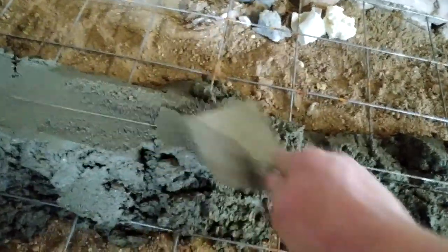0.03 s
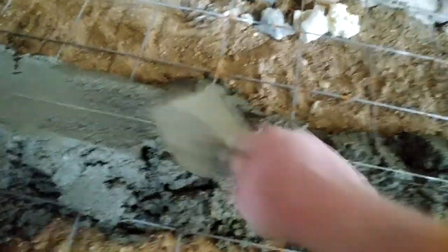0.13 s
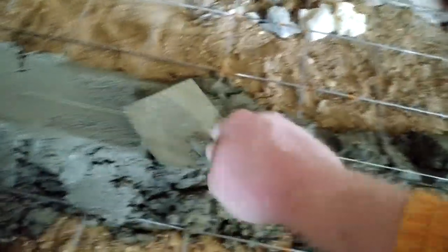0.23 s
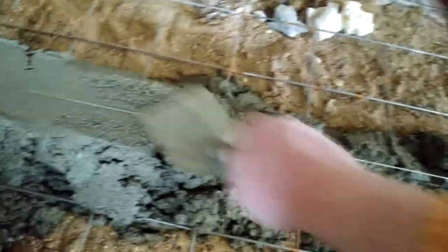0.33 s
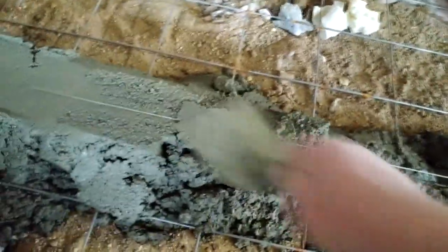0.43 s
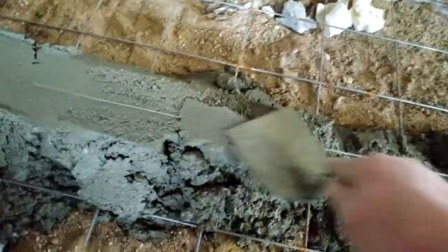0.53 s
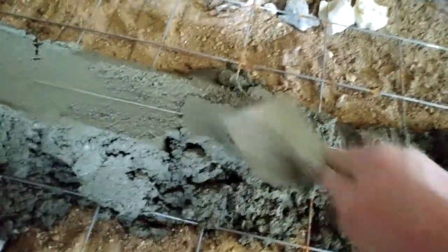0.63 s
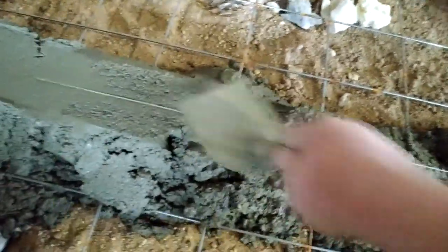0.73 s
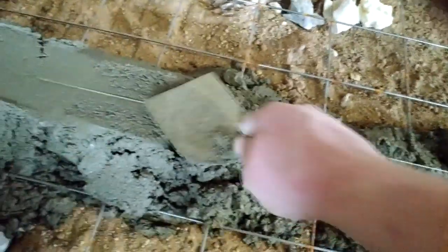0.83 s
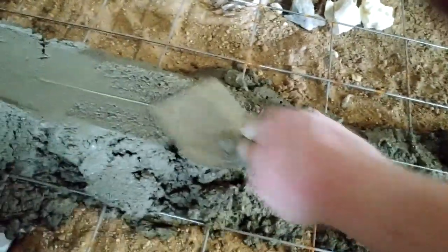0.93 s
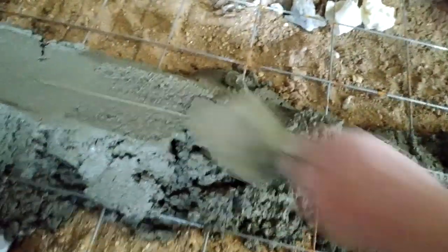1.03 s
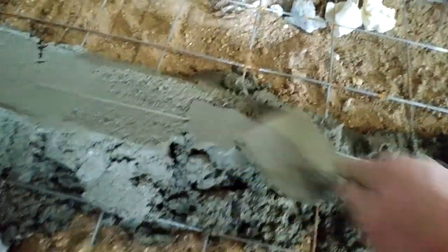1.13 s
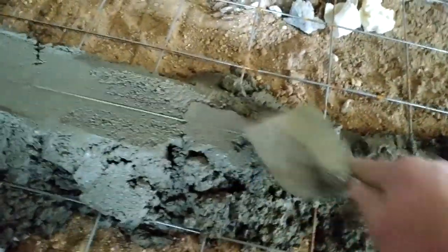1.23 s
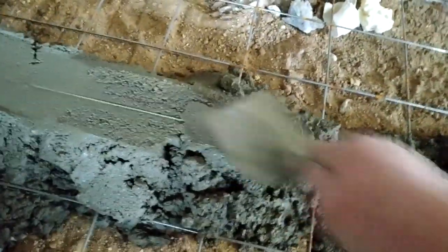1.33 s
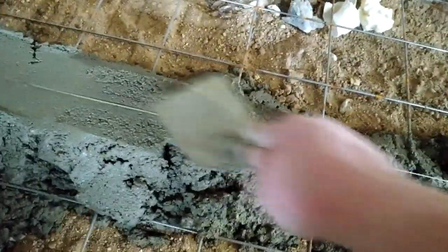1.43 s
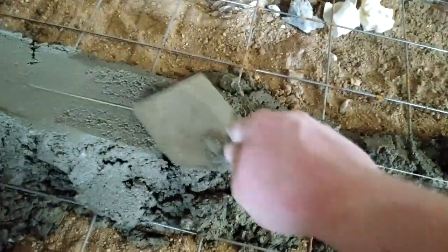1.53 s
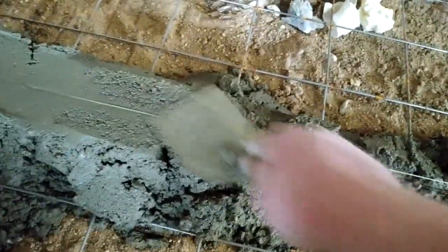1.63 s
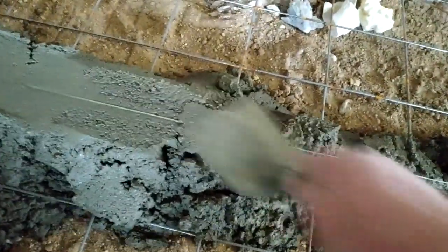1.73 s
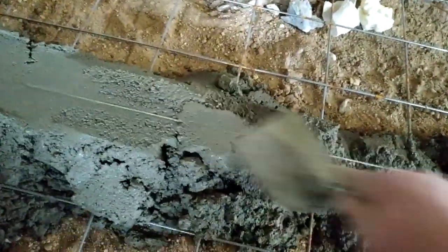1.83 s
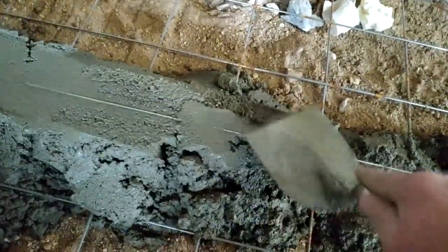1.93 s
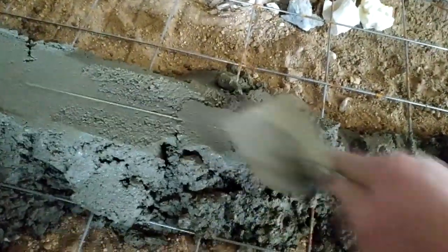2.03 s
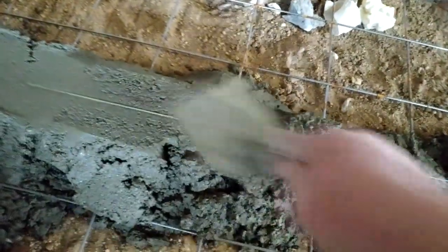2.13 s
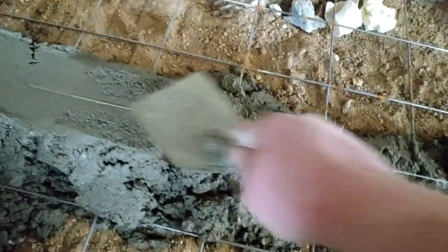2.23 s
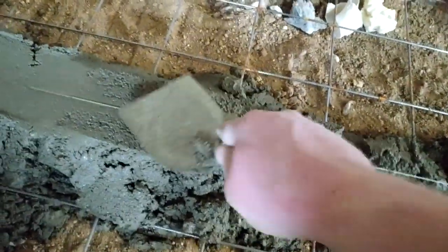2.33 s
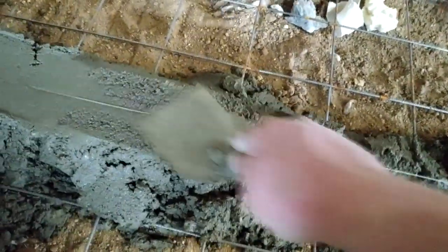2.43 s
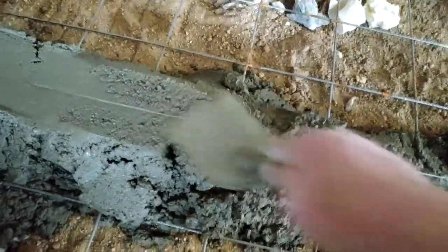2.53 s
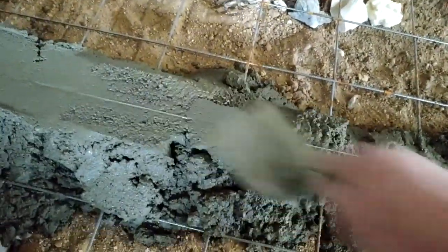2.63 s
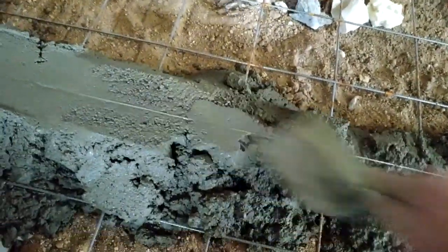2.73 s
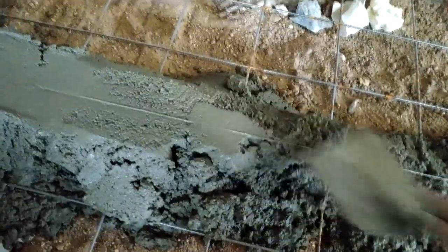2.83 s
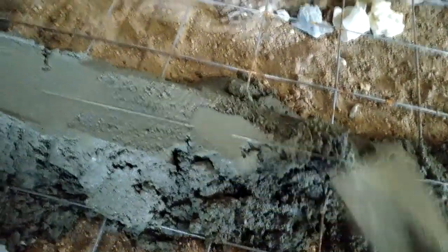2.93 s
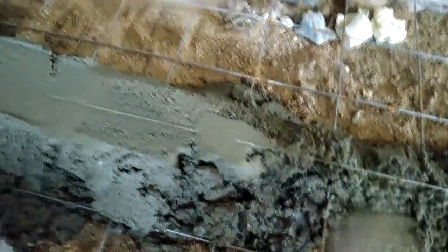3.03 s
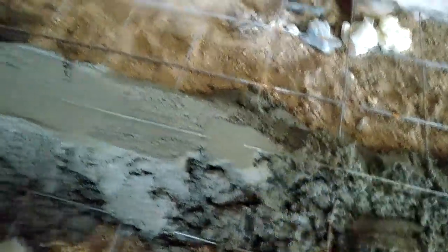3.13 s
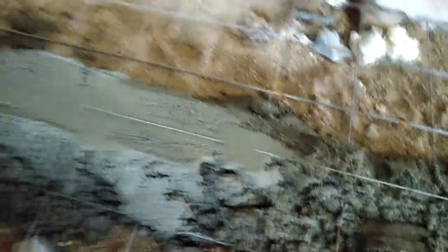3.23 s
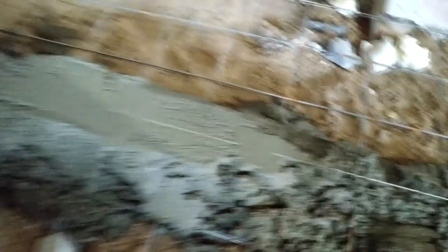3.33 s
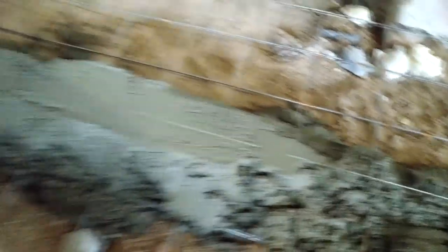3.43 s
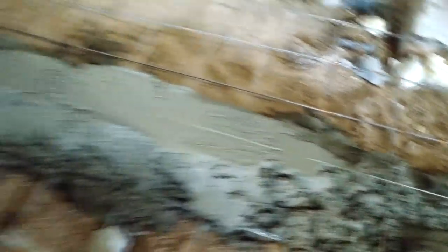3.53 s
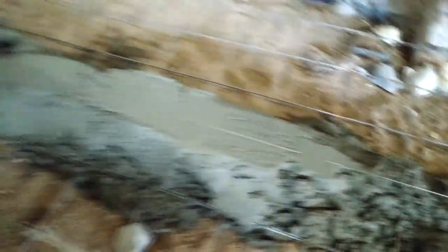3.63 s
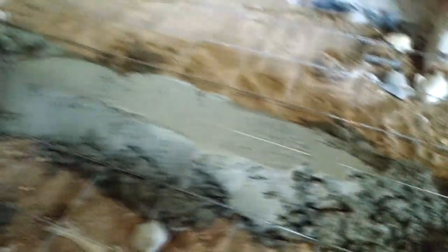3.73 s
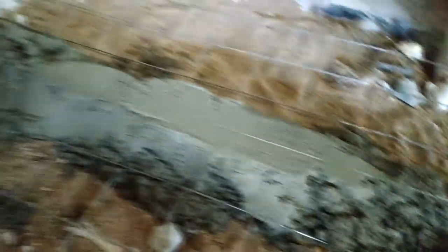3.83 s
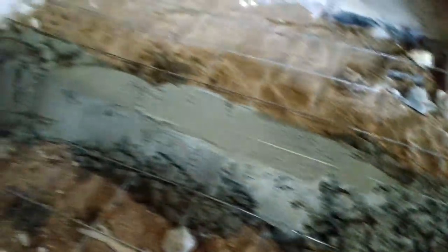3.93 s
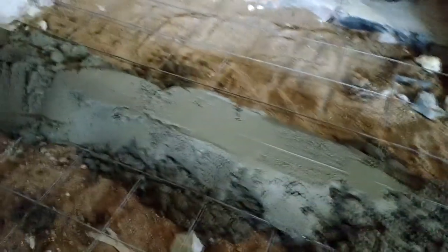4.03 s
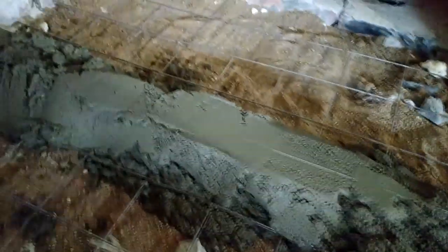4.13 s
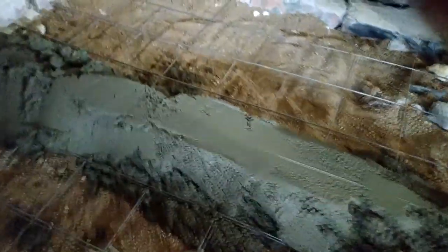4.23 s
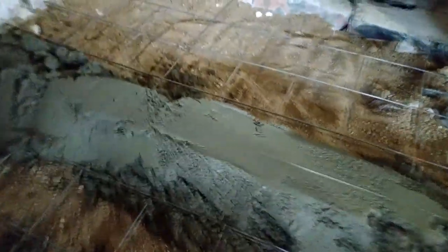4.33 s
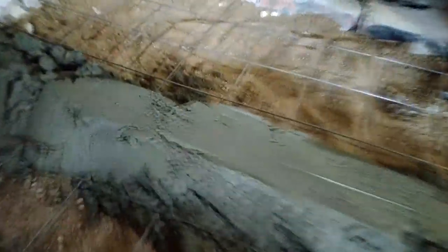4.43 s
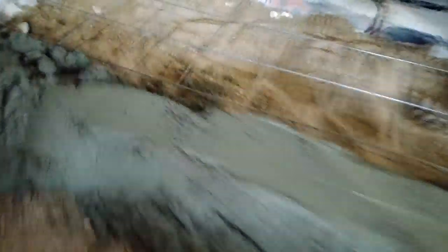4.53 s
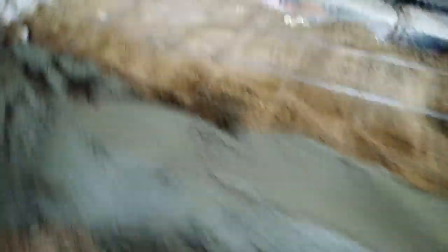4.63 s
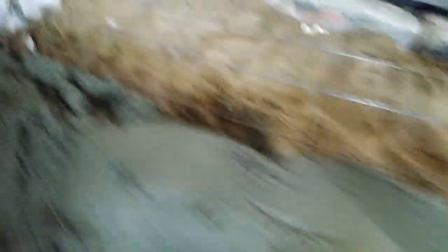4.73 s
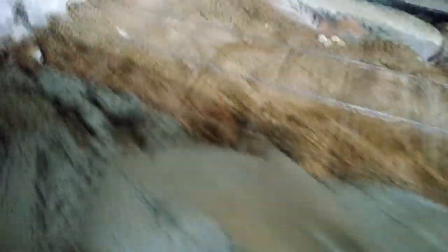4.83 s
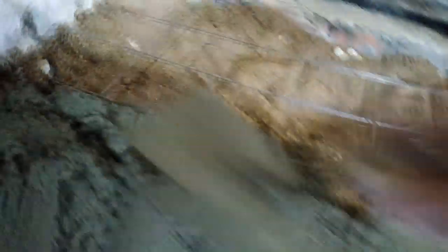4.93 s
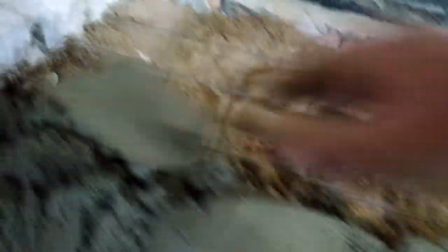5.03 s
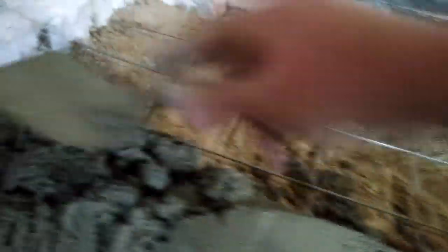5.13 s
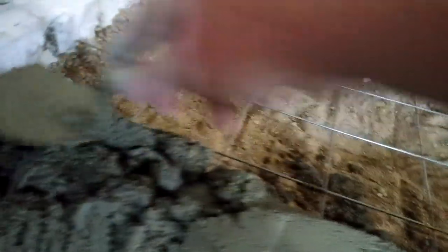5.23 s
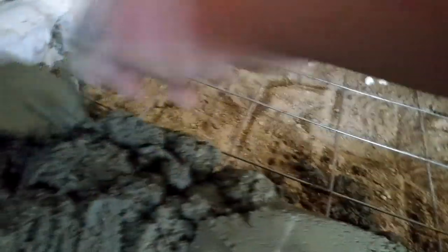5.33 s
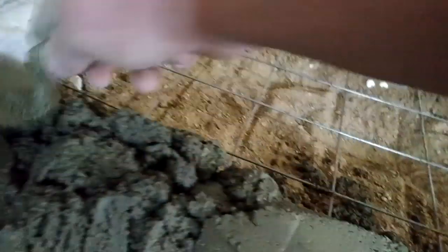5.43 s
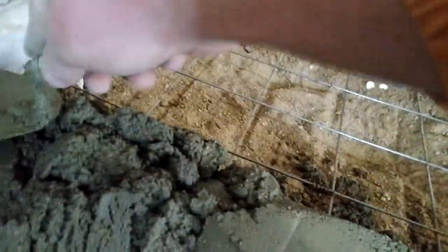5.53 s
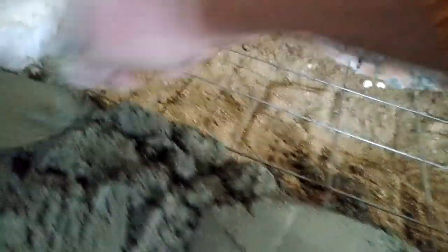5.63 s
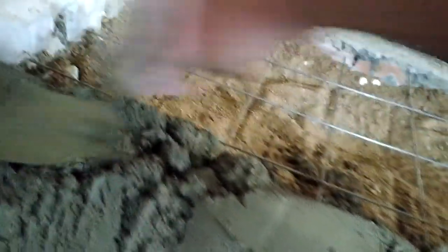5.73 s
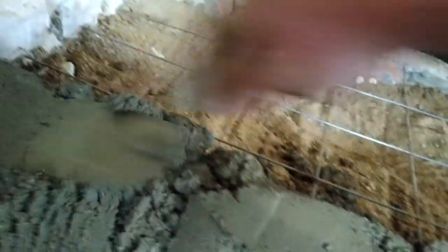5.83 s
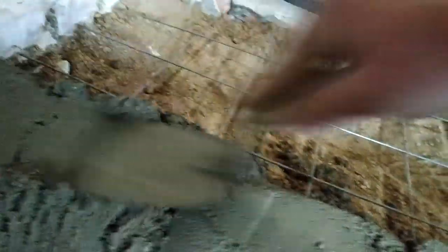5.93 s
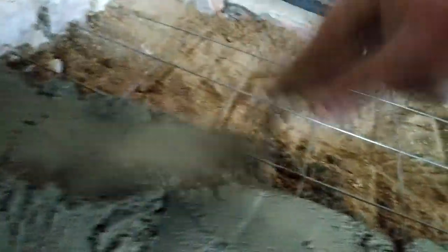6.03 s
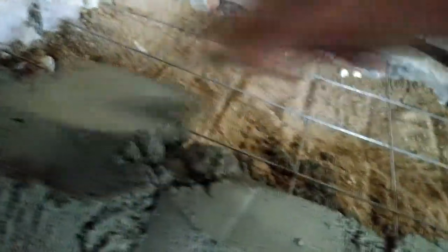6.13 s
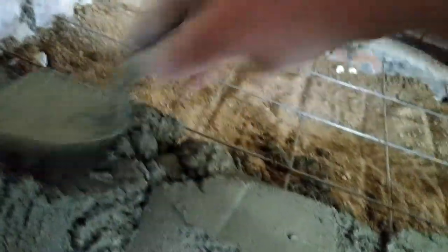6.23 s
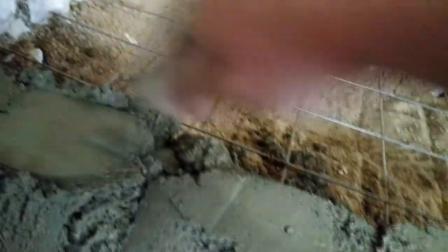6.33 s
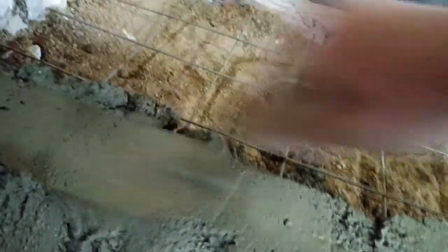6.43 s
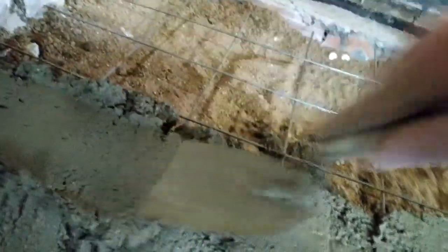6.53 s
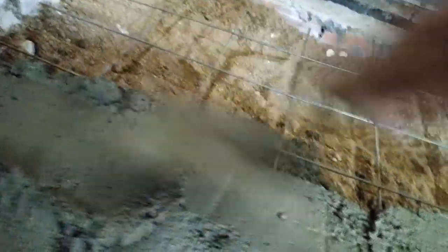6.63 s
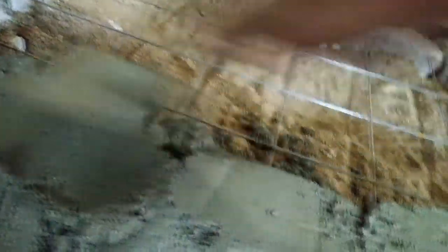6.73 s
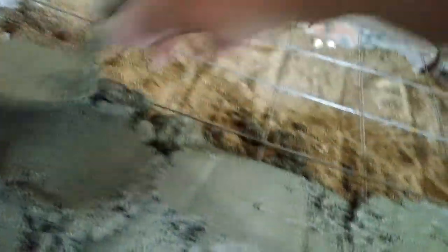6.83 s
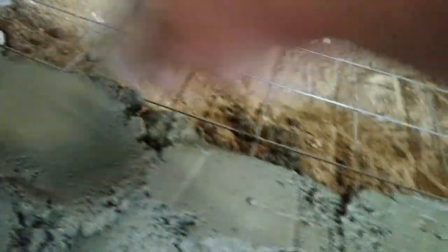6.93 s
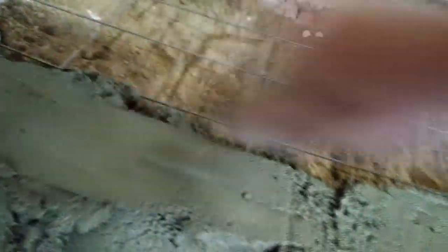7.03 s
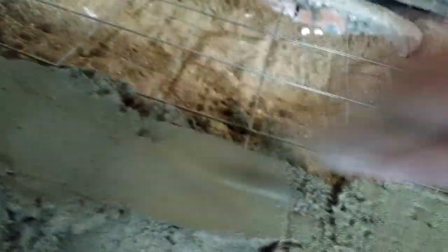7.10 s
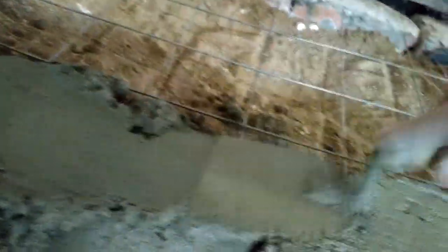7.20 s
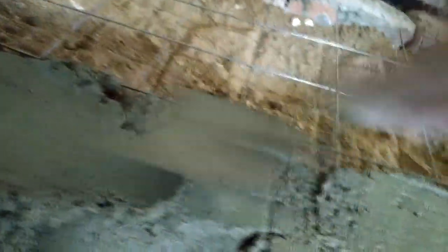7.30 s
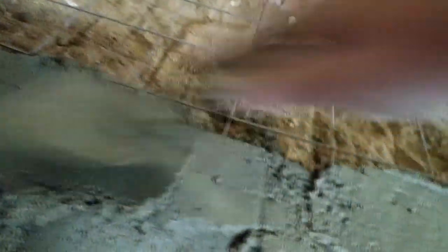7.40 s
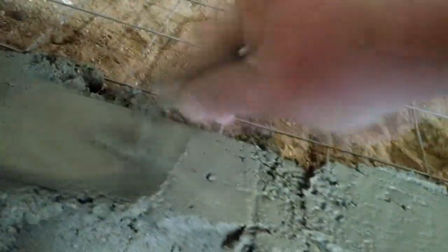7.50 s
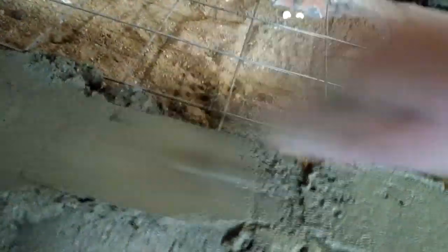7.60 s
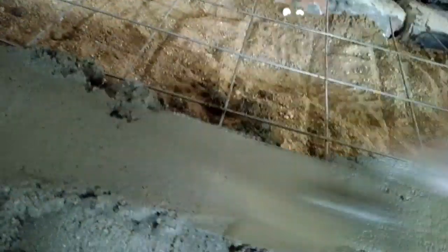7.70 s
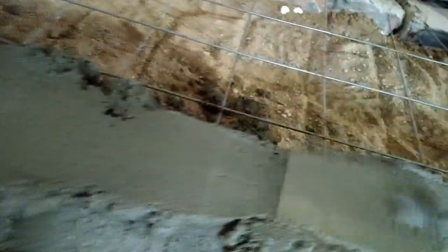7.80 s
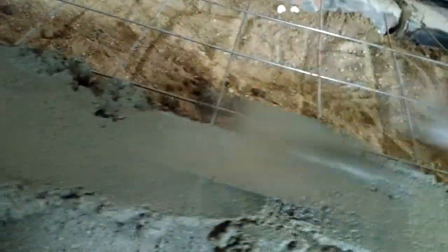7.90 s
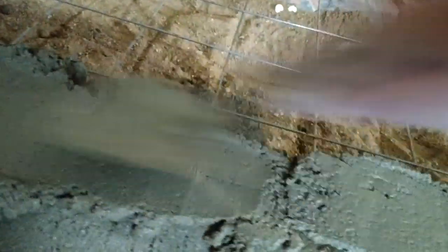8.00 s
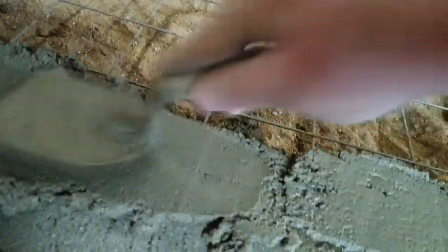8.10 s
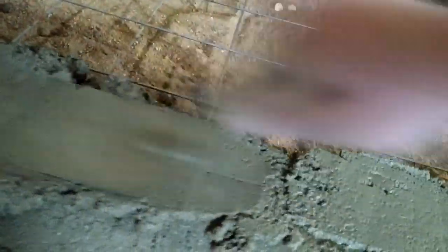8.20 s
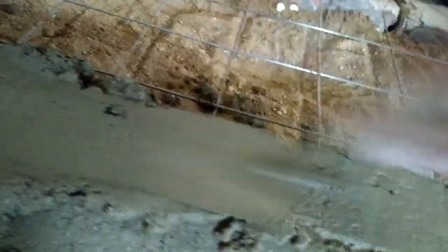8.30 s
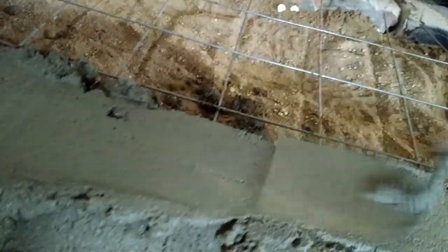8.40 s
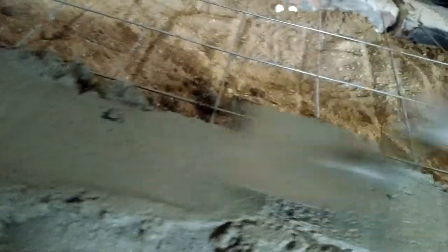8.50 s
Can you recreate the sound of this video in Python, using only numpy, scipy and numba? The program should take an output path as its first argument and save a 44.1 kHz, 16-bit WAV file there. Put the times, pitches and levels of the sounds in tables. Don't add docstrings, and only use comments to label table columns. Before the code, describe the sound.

A steel trowel scrapes harshly over wet sandy mortar indoors, with dull stone knocks and rings, then quieter drags and soft hissing smoothing strokes.

```python
import sys
import numpy as np
from scipy import signal
from scipy.fft import rfft, irfft, next_fast_len
from scipy.io import wavfile
from scipy.ndimage import uniform_filter1d
from numba import njit

SR = 44100
rng = np.random.default_rng(int(sys.argv[2]) if len(sys.argv) > 2 else 0)


def output_pcm(signal):
    pcm = np.clip(np.atleast_2d(signal).T, -1, 1) * 32767
    wavfile.write(sys.argv[1], SR, np.round(pcm).astype(np.int16))


def makeup_ratio(level_db):
    decades = np.asarray(level_db, float) / 20
    return 10 ** decades


N = 377496


def rms_one(x):
    return x / np.sqrt(np.mean(x ** 2) + 1e-20)


def band(x, low_hz, high_hz):
    return signal.sosfilt(signal.butter(2, [low_hz, high_hz], "band", fs=SR, output="sos"), x)


def high_pass(x, low_hz):
    return signal.sosfilt(signal.butter(4, low_hz, "high", fs=SR, output="sos"), x)


def at_hz(points, hz):
    points = np.array(points)
    return np.interp(np.log(hz), np.log(points[:, 0]), points[:, 1])


def drift(rate_hz):
    r = np.exp(-2 * np.pi * rate_hz * 40 / SR)
    noise = rng.standard_normal(N // 40 + 2002)
    slow = signal.lfilter([1], [1, -2 * r, r * r], noise)[2000:]
    return np.interp(np.arange(N) / 40, np.arange(len(slow)), rms_one(slow))


def spread(pair, alike):
    alike = np.clip(alike, -1, 1)
    return np.sqrt(1 + alike) * pair[0] + np.sqrt(1 - alike) * pair[1] * [[1], [-1]]


def banded(source, spectrum, likeness, patchy_db, patch_rate):
    out = 0
    edges = 22.5 * 2 ** np.arange(0, 9.6, .5)
    for k, (low, high) in enumerate(zip(edges, edges[1:])):
        hz = np.sqrt(low * high)
        if spectrum[0][0] <= hz <= spectrum[-1][0]:
            pair = band(source[k % 2], low, high)
            level_db = at_hz(spectrum, hz) + patchy_db * drift(patch_rate)
            out = out + makeup_ratio(level_db) * spread(pair, at_hz(likeness, hz))
    return rms_one(out)


def field(shape, bins, frames):
    over_pitch = uniform_filter1d(rng.standard_normal(shape), size=bins, axis=0)
    return rms_one(uniform_filter1d(over_pitch, size=frames, axis=1))


def reshaped(x, gain_for):
    hz, _, z = signal.stft(x, SR, "hann", 2048, 1024)
    share = np.clip((hz - 2100) / 600, 0, 1)[:, None]
    gain = 1 - share + share * gain_for(hz[:, None], z.shape[1:])
    return signal.istft(z * gain, SR, "hann", 2048, 1024)[1][:, :N]


def mottled(x, streak_db):
    def streaks(hz, shape):
        return rms_one(makeup_ratio(streak_db * np.minimum(field(shape, 3, 2), 1.2)))
    return rms_one(reshaped(x, streaks))


def surroundings():
    # time in seconds, level in dB.
    room = [(0, -50.5), (.9, -51), (1.1, -48), (1.99, -49.5), (2.31, -40.5), (2.6, -45.5), (2.8, -48.5),
            (3.6, -49.5), (3.89, -43), (4.3, -51), (4.61, -47.5), (4.85, -52), (5.05, -59.5), (5.16, -52.5),
            (6, -51), (7.2, -56.5), (7.6, -55), (8.56, -53.5)]
    # pitch in Hz, level in dB per Hz.
    rumble_colour = [(15, -74), (25, 10), (98, -29), (164, -4.5), (253, 2.5), (325, -5.5), (425, -5.5),
                     (556, -6.5), (1190, -5), (1380, -15), (1810, -9), (2620, -15.5), (3500, -25.5),
                     (4550, -45.5), (7700, -120)]
    # pitch in Hz, level in dB per Hz.
    hiss_colour = [(1180, -48), (2000, -2.5), (3090, -8.5), (6040, -7.5), (9920, -12.5), (15100, -10.5),
                   (16000, -18)]
    # pitch in Hz, left-right likeness from -1 to 1.
    likeness = [(60, 0.74), (150, 0.87), (380, 0.8), (950, -0.33), (2380, -0.055), (5980, -0.1),
                (15000, 0.029)]
    t = np.arange(N) / SR
    bustle_db = np.interp(t, *np.transpose(room))
    rumble = banded(rng.standard_normal((2, 2, N)), rumble_colour, likeness, patchy_db=2.0, patch_rate=9.1)
    rumble = high_pass(rumble, 141)
    hiss = banded(rng.standard_normal((2, 2, N)), hiss_colour, likeness, patchy_db=.4, patch_rate=15)
    hiss = mottled(hiss, streak_db=6.5)
    turned = np.clip((t - 5.09) / 0.062 + .5, 0, 1)
    settled = 1 - np.exp(-np.maximum(t - 4.78, 0) / 0.54)
    rumble_db = bustle_db + 1.5 - 17.5 * turned
    hiss_db = -56 + bustle_db - bustle_db.mean() - 14.5 * settled
    return makeup_ratio(rumble_db) * rumble + makeup_ratio(hiss_db) * hiss


def walls(x):
    t60_s, wall_cut_hz = 0.36, 5600
    size = next_fast_len(N + SR)
    w = 2 * np.pi * np.arange(size // 2 + 1) / size
    dull = 1 / (1 + 1j * w * SR / (2 * np.pi * wall_cut_hz))
    sides = np.zeros((2, len(w)), complex)
    for k, lag in enumerate(rng.uniform(0.015, 0.036, 16) * SR):
        loop = makeup_ratio(-60 * lag / SR / t60_s) * dull * np.exp(-1j * w * lag)
        sides[k % 2] += loop / (1 - loop) * (-1) ** (k // 2)
    return irfft(sides * rfft(x.mean(axis=0), size), size)[:, :N]


def knocks(rows, thud_db, thud_hz):
    out = np.zeros((2, N))
    t = np.arange(round(.15 * SR)) / SR
    noise = rng.standard_normal((len(rows), 3, len(t)))
    thuds = rms_one(band(noise[:, 0], 300, thud_hz))
    cracks = rms_one(band(noise[:, 1:], 2000, 15000))
    for (s, db, hz, crack_db, pan_db), thud, crack in zip(rows, thuds, cracks):
        t60 = 0.024 + 14 / hz
        tones = np.sin(2 * np.pi * hz * t) + 0.34 * np.sin(2 * np.pi * 1.3 * hz * t)
        hit = (1 - np.exp(-t / 0.003)) * tones * makeup_ratio(-60 * t / t60)
        hit = hit + makeup_ratio(thud_db - 60 * t / 0.028) * thud
        hit = hit + makeup_ratio(crack_db + 10.5 - 60 * t / .02) * crack
        at = round(s * SR)
        out[:, at:at + len(t)] += makeup_ratio(db - 1.5 + pan_db * np.array([[.5], [-.5]])) * hit[:, :N - at]
    return out


def all_knocks():
    # start in seconds, peak in dB, ring in Hz,
    # crack against the ring in dB, left over right in dB.
    stones = [(1.112, -17, 1080, -17, 5), (1.128, -24, 1180, -9, -2), (1.584, -24, 1616, -5.5, -8),
              (1.759, -13.5, 1280, -28, 0.5), (1.809, -26, 1210, -14, 4), (2.414, -34, 1330, 2, -10.5),
              (2.605, -19.5, 1570, -15, -5.5), (2.697, -22, 1154, -12, 0), (3.71, -21, 860, -32, -13),
              (3.765, -28.5, 1240, -25, -13), (3.807, -32, 1400, -14, 3), (3.819, -24, 1256, -16, -10),
              (3.939, -23.5, 1280, -17, -7), (5.45, -44, 3370, -1.5, -1.5), (7.486, -70, 1210, 16, 5),
              (8.242, -52, 1406, 7, 1)]
    # start in seconds,
    # peak in dB, ring in Hz, crack against the ring in dB, left over right in dB.
    bumps = [(1.118, -33, 508, -25, 0), (1.83, -33, 670, -25, -1), (2.755, -36, 594, -36, -1.5),
             (2.548, -19.5, 225, -33, 1.5), (3.02, -37, 215, -12, 4.5), (3.093, -40.5, 259, -13, -4.5),
             (3.176, -60, 246, 12.5, -4), (3.362, -35, 396, -15.5, 1), (3.688, -26.5, 311, -34, -2.5),
             (4.602, -33, 226, -28, 5), (4.606, -29, 334, -32.5, 4.5), (5.063, -45, 330, -20, 9),
             (5.624, -49.5, 262, 4.5, 6), (6.709, -57, 222, -19.5, 6.5)]
    ticks = [
        (4.605, -33.5, 1500, -24, 10),
        (3.712, -29.5, 1230, -24, -6),
        (5.608, -41.5, 930, -6, 7),
        (6.903, -54, 480, -20, 12),
        (7.671, -54, 1100, -3, -9),
    ]
    hits = knocks(stones, thud_db=-9.5, thud_hz=2460) + knocks(bumps, thud_db=-9.5, thud_hz=800)
    return hits + knocks(ticks, thud_db=1.5, thud_hz=2600)


@njit
def resonate(x, cosine, r):
    y = np.zeros_like(x)
    for i in range(2, len(x)):
        y[i] = (1 - r * r) / 2 * (x[i] - x[i - 2]) + 2 * r * cosine[i] * y[i - 1] - r * r * y[i - 2]
    return y


def moving(pair, hz, width_hz):
    cosine = np.cos(2 * np.pi * hz / SR)
    r = np.exp(-np.pi * width_hz / SR)
    return rms_one(np.array([resonate(resonate(x, cosine, r), cosine, r) for x in pair]))


def ring(clicks, hz, t60):
    r, w = makeup_ratio(-60 / (t60 * SR)), 2 * np.pi * hz / SR
    return signal.lfilter([0, np.sin(w)], [1, -2 * r * np.cos(w), r * r], clicks + 1e-18)


def sand(per_s, size_db, clump_db):
    shape = (2, 2, N)
    sizes = makeup_ratio(size_db * np.minimum(rng.exponential(1, shape), 5)) * rng.choice([-1, 1], shape)
    slips = rng.random(shape) < per_s / SR
    return rms_one(sizes * slips * makeup_ratio(clump_db * drift(37)))


def contact():
    # start in seconds, contact in seconds, bite (build-up) in seconds,
    # grain hiss in dB, change towards the end in dB.
    scrapes = [
        (.31, 0.18, 0.11, -28, -4.5),
        (.858, 0.24, 0.19, -29.5, -5.5),
    ]
    dabs = [(1.918, 0.11, .005, -44, -5), (2.09, 0.14, 0.075, -42, 0), (2.245, 0.11, 0.068, -35, -3),
            (2.97, 0.23, 0.017, -47.5, -20), (3.175, .008, .002, -53, -20), (3.36, 0.017, .003, -49, -15),
            (3.6, .08, 0.049, -56.5, 0), (3.688, .045, .003, -45, -3.5), (4.36, .24, .2, -54, 0),
            (4.625, .025, .004, -51, -6), (4.65, 0.23, .02, -55.5, 1), (4.9, .25, .02, -57.5, -13),
            (5.455, 0.08, .005, -57, -6), (6.239, .02, .002, -52, -3), (8.103, 0.018, .003, -52, 4),
            (6.828, .05, 0.0046, -60, -1)]
    smooths = [
        (6.239, 0.26, 0.1, -40, -1),
        (6.86, 0.29, .06, -38.5, -4.5),
        (7.485, 0.25, .002, -39.5, -1.5),
        (8.104, 0.26, 0.077, -39, -3.5),
    ]
    drags = [
        (3.77, .14, 0.079, -37.5, -7),
        (3.91, 0.098, 0.04, -40, -7),
        (4.04, 0.13, .005, -55, 4),
        (4.16, 0.07, 0.033, -51, 2),
    ]
    tilted = [
        (5.53, 0.14, 0.096, -41.5, -9),
        (5.67, 0.26, 0.11, -43, -2),
    ]
    rubs = [
        (5.18, .03, .015, -73.5, -7),
        (5.37, .03, 0.014, -65, -5),
        (7.33, .14, .03, -89.5, -2),
        (8.485, .07, 0.011, -75, -2),
    ]
    pushes = [
        (1.67, 0.16, .03, -31, 1.5),
        (2.6, .06, .01, -31.5, 1),
    ]
    chops = [
        (1.583, 0.087, 0.0033, -30.5, 0),
        (2.413, 0.18, .003, -28, -4.5),
    ]
    flicks = [
        (2.655, 0.076, .04, -24.5, -2),
    ]
    # edge in Hz, edge level in dB,
    # blade in Hz, blade level in dB, left over right in dB, lumpiness;
    # then bite power, hiss fade and ring fade in dB per second.
    scrape = ([(4200.5, 3200), (1.5, -2), (1650.5, 1149.5), (-4, -1), (-2, -1), (1.33, 1.03)], 0.4, 820, 470)
    dab = ([(3599, 3652), (-0.5, -0.5), (1702.5, 1449.5), (-0.5, -3), (-0.2, 1), (0.5, .4)], 0.65, 170, 500)
    smooth = ([(4800, 4100), (-7, -8), (1950, 2000), (-17, -6), (-1.5, -1.2), (.2, .2)], .7, 700, 600)
    drag = ([(3200, 3250.5), (0, -1.5), (1248.5, 1376.5), (6, 4), (-0.5, -2.5), (1.8, 0.1)], 0.57, 390, 500)
    tilt = ([(4302, 4501.5), (-1, -6), (1903, 1749), (-4.5, -3.5), (-2.2, -1.9), (-1.4, 0.4)],
             0.62, 265, 260)
    rub = ([(3600, 3651), (0, 0), (1950, 1949.5), (14, 10.5), (.6, 4), (.9, 1.3)], 0.73, 370, 680)
    push = ([(3499.5, 3202.5), (1.5, -2), (1400, 1151.5), (-2.5, 0), (-2, 0.3), (0.6, 0.5)], 0.5, 990, 410)
    chop = ([(4399, 3799.5), (2.5, 1), (1800, 1499.5), (-6, -0.5), (-1.5, -0.3), (.8, 0.6)], .5, 900, 400)
    flick = ([(3499.5, 3400), (-9.5, -10.5), (1240.5, 1170), (-7.5, -2), (-1, -0.2), (1, 0.7)],
              0.52, 870, 450)
    kinds = [(scrapes, scrape), (dabs, dab), (smooths, smooth), (drags, drag), (tilted, tilt),
             (rubs, rub), (pushes, push), (chops, chop), (flicks, flick)]
    events = [(row, kind) for rows, kind in kinds for row in rows]
    t, gains = np.arange(N) / SR, np.zeros((2, N))
    colour = np.ones((len(dab[0]), N)) * np.array(dab[0])[:, :1]
    for (s, length, bite, db, change_db), (ends, power, *fades) in sorted(events, key=lambda e: e[0][0]):
        at = round(s * SR)
        age = t[at:] - t[at]
        held_db = db + change_db * np.clip((age - bite) / max(length - bite, 1e-3), 0, 1)
        off = np.maximum(age - length, 0)
        lifted_db = np.minimum(np.outer(fades, off ** 2 / (off + 0.0096)), 200)
        gain = np.minimum(age / bite, 1) ** power * makeup_ratio(held_db - lifted_db)
        gains[:, at:] = np.hypot(gains[:, at:], gain)
        first, last = np.transpose(ends)[:, :, None]
        colour[:, at:] = first + (last - first) * np.minimum(age / length, 1)
    return gains, uniform_filter1d(colour, size=300, axis=1)


def strokes():
    # pitch in Hz, level in dB per Hz.
    grain_colour = [(1350, -45.5), (2300, -9), (3620, -4.5), (4030, -20.5), (6940, -1.5), (7460, -5),
                    (9210, -1), (14600, 1.5), (16000, -4)]
    # pitch in Hz, left-right likeness from -1 to 1.
    likeness = [(60, 0.64), (180, 0.84), (550, 0.85), (1650, 1), (4970, 0.1), (15000, 0.0057)]
    # pitch in Hz, level in dB, time to fade by 60 dB in seconds.
    blade_modes = [(1077, -10.5, 0.18), (1212, -6.5, 0.19), (1400, -12.5, .05), (2373, -4, 0.011)]
    (hissing, ringing), (edge_hz, edge_db, blade_hz, blade_db, pan_db, lumpy) = contact()
    grains = sand(per_s=14000, size_db=1.5, clump_db=2.5 * lumpy)
    coarse = sand(per_s=2500, size_db=1.0, clump_db=1.5 * lumpy)
    hiss = banded(grains, grain_colour, likeness, patchy_db=1.4 * lumpy, patch_rate=13.1)
    hiss = band(band(hiss, 1900, 17000), 1800, 19000)
    hiss = makeup_ratio(1.75) * mottled(hiss, streak_db=7.0)
    edge = spread(moving(coarse[0], edge_hz, width_hz=2760), 0.1)
    edge = makeup_ratio(edge_db - 2.0) * mottled(edge, streak_db=6.5)
    shaken = band(coarse[1], 880, 3900)
    modes = sum(makeup_ratio(db) * rms_one(ring(shaken, hz, t60)) for hz, db, t60 in blade_modes)
    mortar = makeup_ratio(-10.5) * rms_one(band(coarse[0], 450, 1300))
    free = np.clip((1700 - blade_hz) / 400, 0, 1)
    blade = moving(coarse[1], blade_hz, width_hz=900) + free * modes + mortar
    blade = makeup_ratio(blade_db - 11.0) * spread(blade, 0.47)
    return makeup_ratio(pan_db * [[.5], [-.5]]) * (hissing * (hiss + edge) + ringing * blade)


def scene():
    near = high_pass(strokes() + all_knocks(), 150)
    return near + makeup_ratio(-24.5) * walls(near) + surroundings()


def dropouts(x):
    # start in seconds, length in seconds,
    # centre in Hz, width in Hz.
    valleys = [
        (.93, .05, 6300, 600),
        (1.996, .06, 3450, 400),
        (3.87, .08, 5300, 1300),
        (3.92, .1, 4660, 400),
        (5.7, .2, 3210, 300),
        (6.906, .08, 2600, 650),
        (7.5, .05, 3200, 500),
        (8.13, .05, 2780, 299),
        (8.33, .05, 5680, 400),
    ]

    def kept(hz, shape):
        limit = .9 + hz / 13000
        t = np.arange(shape[1]) * 1024 / SR
        empty = 0
        for s, length, centre_hz, width_hz in valleys:
            in_pitch = np.clip(1.5 - np.abs(hz - centre_hz) / (width_hz / 2), 0, 1)
            in_time = np.clip((length / 2 - np.abs(t - s - length / 2)) / 0.0073 + 1, 0, 1)
            empty = empty + in_pitch * in_time
        narrow = field(shape, 7, 3) < limit
        wide = field(shape, 22, 3) < limit + .7
        return narrow * wide * np.clip(1 - 2 * empty, 0, 1)
    return reshaped(x, kept)


def band_limit(x):
    return signal.sosfilt(signal.butter(12, 16980, fs=SR, output="sos"), x)


def record(dry):
    cut = signal.sosfilt(signal.cheby2(20, 60, 16420, fs=SR, output="sos"), dry)
    return band_limit(dropouts(cut))


dry = scene()
out = record(dry)
output_pcm(out)
```